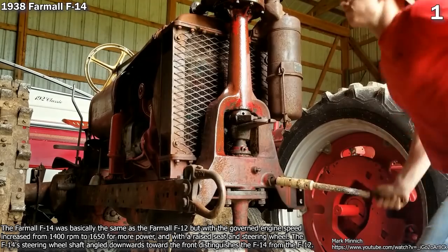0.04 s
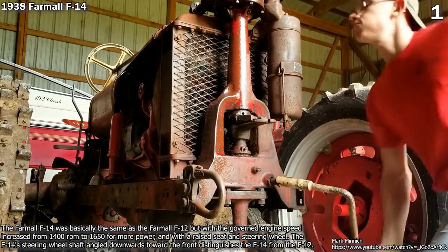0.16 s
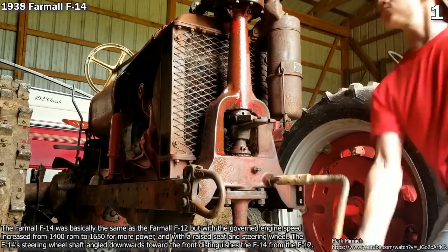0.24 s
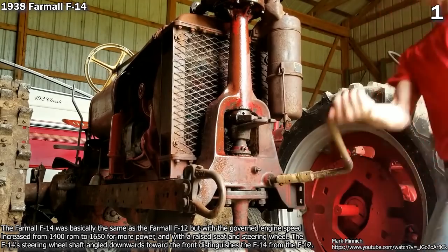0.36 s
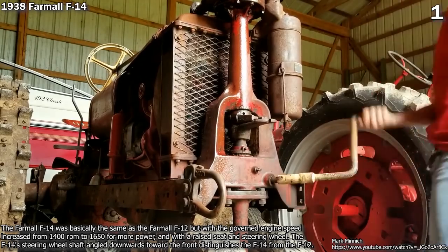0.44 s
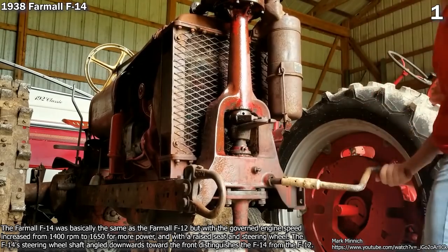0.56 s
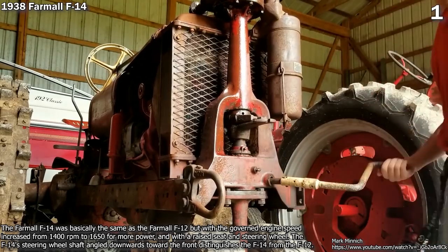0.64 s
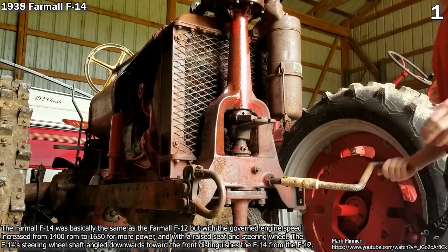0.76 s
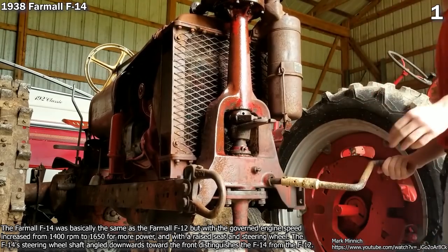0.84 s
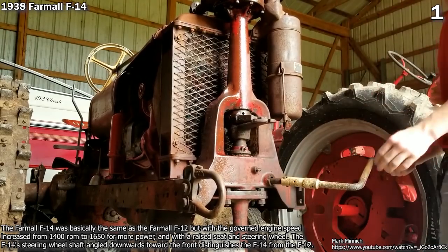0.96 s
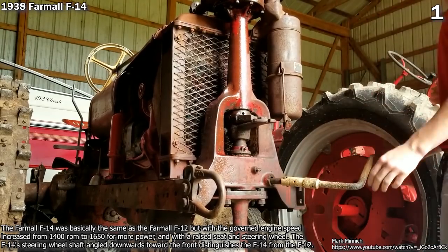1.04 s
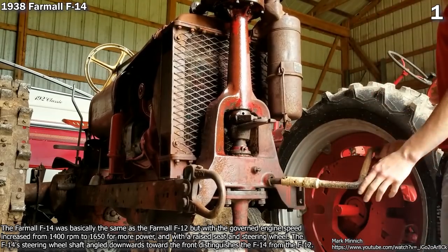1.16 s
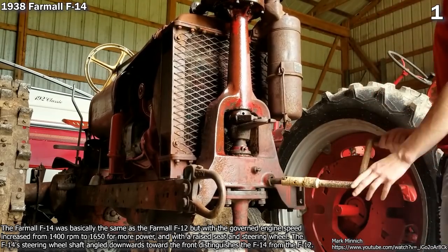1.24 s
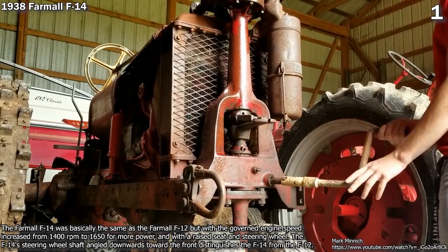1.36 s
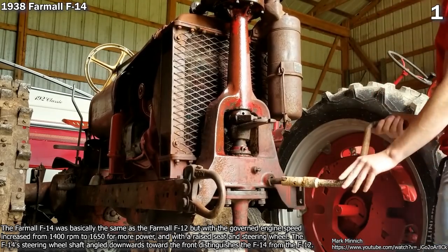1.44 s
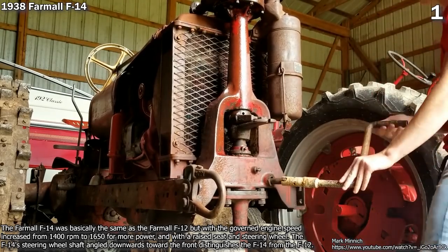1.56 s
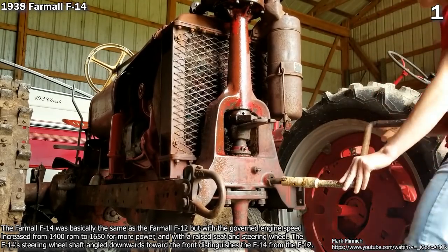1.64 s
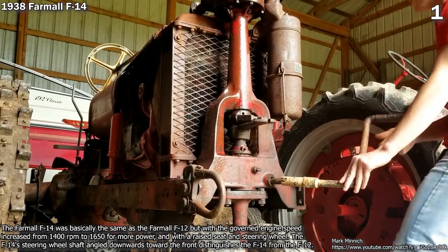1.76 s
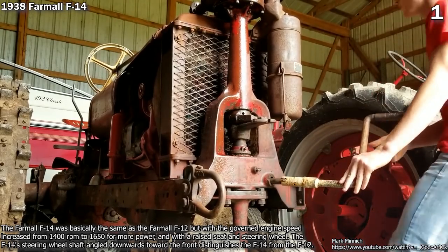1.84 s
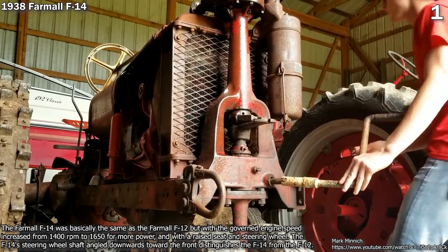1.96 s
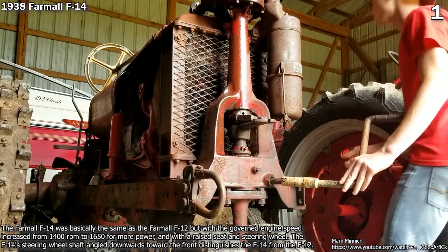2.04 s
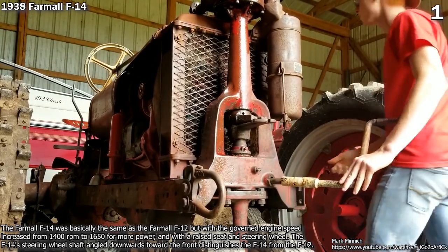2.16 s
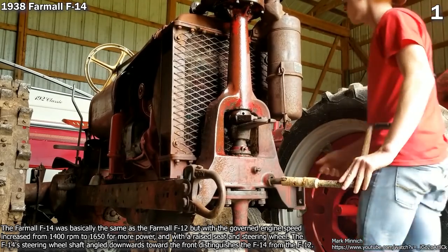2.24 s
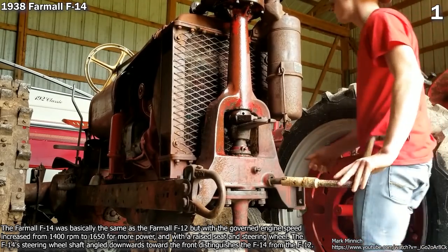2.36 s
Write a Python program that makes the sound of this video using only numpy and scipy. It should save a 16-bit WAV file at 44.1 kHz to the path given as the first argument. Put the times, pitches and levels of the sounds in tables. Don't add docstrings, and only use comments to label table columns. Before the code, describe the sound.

Old tractor engine hand-cranked in a metal barn, heavy iron clunks and bright snaps, not starting

```python
import sys
import numpy as np
from scipy import signal
from scipy.fft import rfft, irfft, next_fast_len
from scipy.io import wavfile
from scipy.ndimage import uniform_filter1d, map_coordinates

SR = 44100
rng = np.random.default_rng(int(sys.argv[2]) if len(sys.argv) > 2 else 0)


def ratio_of_db(decibels):
    return 10 ** (np.asarray(decibels, float) / 20)


def transcribe(u):
    v = np.clip(np.atleast_2d(u).T, -1, 1)
    q = np.round(v * 32767).astype(np.int16)
    wavfile.write(sys.argv[1], SR, q)


N = 105840

# frequency in Hz, level in dB.
HUM = [(59.8, -65.5), (119.6, -67.5)]
# frequency in Hz, level in dB.
AIR_TONE = [(12, -57.5), (20, -41), (70, -5), (242, -24.5), (638, -27.5), (1730, -37.5), (2770, -24.5),
            (3550, -45.5), (15000, -42.5)]
# middle in seconds, length in seconds, pitch in Hz, level in dB.
CHIRPS = [(0.028, 0.008, 2800, -57), (0.05, 0.06, 2860, -65), (1.788, 0.037, 2770, -63.5),
          (1.831, 0.034, 2690, -60.5), (1.875, .05, 2620, -69.5), (1.95, 0.084, 2430, -65),
          (2.17, .06, 2270, -64), (2.392, 0.03, 3100, -59)]
# middle in seconds, level in dB, pitch in Hz.
THUDS = [
    (0.06, -60, 98),
    (0.385, -42, 95),
    (1.301, -55.5, 130.7),
    (2.331, -60, 105),
    (2.36, -62, 245),
]
# time in seconds, level in dB.
GRIND_LEVEL = [(0.07, -69), (0.12, -42), (0.19, -39), (0.33, -27), (0.45, -34), (0.55, -30.5),
               (0.75, -35.5), (0.9, -37), (1.15, -68.5)]
# frequency in Hz, level in dB.
GRIND_TONE = [(40, -20.5), (200, -11), (400, -11.5), (800, -6.5), (1400, -14.5), (6000, -16.5),
              (8700, -14.5), (15000, -32)]
# start in seconds, peak in dB, chatter in seconds, tilt in dB per octave, echo in dB.
KNOCKS = [
    (1.227, -28, .045, 1, 1),
    (1.257, -35, 0.071, -3, 3),
    (1.712, -50, 0.046, -2, 7.5),
    (2.012, -38, .04, -5.5, 7),
    (2.044, -47, .06, -3.5, 5),
    (2.15, -54, 0.082, -6.5, 2),
    (0.174, -34, .03, 8, -8),
    (0.098, -44, .012, 3, -4),
]
# frequency in Hz, level in dB.
SHEET_TONE = [(60, -40.5), (300, -13), (420, -2.5), (1250, -0.5), (1600, -10), (3000, -16.5), (15000, -32)]
# frequency in Hz, width in Hz, level in dB.
SHEET_PEAKS = [(520, 120, -6), (850, 200, -5)]
# start in seconds, peak in dB, chatter in seconds, tilt in dB per octave, echo in dB.
CLUNKS = [
    (0.106, -36, 0.02, -1, -1),
    (0.134, -30, 0.05, -4, 3.5),
    (0.347, -4.5, 0.029, 0.55, -1),
    (0.365, -15, 0.026, 1, 9.5),
    (0.563, -6, 0.031, 0.47, 2.5),
    (0.574, -16, 0.02, -4, -14),
    (0.771, -4.5, 0.021, 0.33, -3),
]
# frequency in Hz, level in dB.
JAW_TONE = [(60, -40), (330, -16.5), (520, -8), (740, -2.5), (1600, -3.5), (6090, -5), (8620, -12.5),
            (15000, -16)]
# frequency in Hz, width in Hz, level in dB.
JAW_PEAKS = [(740, 260, -2), (1240, 120, -10), (1830, 160, -4), (3010, 250, -6), (4040, 250, -5),
             (6100, 400, -5), (12700, 150, -6)]
# start in seconds, peak in dB, chatter in seconds, tilt in dB per octave, echo in dB.
SNAPS = [(0.126, -33, 0.014, 2, -5.5), (0.136, -33, 0.0096, 1, -8.5), (0.191, -20, 0.0066, 6, -7),
         (0.204, -7, 0.022, 1.5, -1.5), (0.314, -21, 0.056, 3, 0), (0.446, -4, 0.022, 0.76, -5.5),
         (0.456, -14.5, 0.013, -2, -9), (0.629, -5.5, 0.039, 0.2, -4), (0.91, -18, 0.038, 0, 0.5),
         (0.923, -21.5, 0.034, -1.5, 1.5), (1.085, -29.5, 0.018, -2, 6), (1.607, -42, 0.025, 0.5, -4),
         (1.977, -45.5, 0.014, -7, 7)]
# frequency in Hz, level in dB.
GEAR_TONE = [(60, -35), (330, -14), (760, -5), (1900, -4), (4500, -2), (7200, -5), (8700, -3),
             (15000, -14.5)]
# frequency in Hz, width in Hz, level in dB.
GEAR_PEAKS = [(760, 370, -2), (3600, 500, -5), (4620, 250, -5), (5700, 350, -4), (7100, 300, -2),
              (9300, 300, -5), (12800, 250, -6)]
# time in seconds, level in dB.
DRONE_LEVEL = [(0.15, -78), (0.3, -53.5), (0.4, -40.5), (0.5, -52), (0.7, -38), (0.8, -44.5), (0.9, -43.5),
               (1.02, -50.5), (1.2, -76.5)]
# frequency in Hz, width in Hz, level in dB.
FRAME_PEAKS = [(206.8, 17, -3), (396.4, 31, -0.5), (511, 32, -7)]
# start in seconds, pitch in Hz, level in dB, 60 dB decay in seconds.
RINGS = [(0.205, 893, -21, 0.11), (0.205, 739, -25, 0.18), (0.348, 696.6, -20, 0.22),
         (0.348, 990, -25, 0.27), (0.348, 1846, -24, .12), (0.348, 2010, -27.5, 0.24),
         (0.348, 2425, -23.5, 0.54), (0.447, 728, -32.5, 0.18), (0.563, 740, -20.5, 0.14),
         (0.563, 1232, -20, 0.14), (0.563, 1980, -29.5, 0.083), (0.563, 2475, -23.5, 0.15),
         (0.58, 820, -26.5, 0.55), (0.63, 498, -28.5, .25), (0.771, 740, -17.5, 0.08),
         (0.771, 657, -25.5, .2), (0.771, 2425, -29, 0.22), (0.771, 3025, -30, .12),
         (0.912, 759, -32, 0.35), (0.68, 800, -30, 0.16), (0.8, 905, -27.5, 0.18)]
# start in seconds, pitch in Hz, level in dB, 60 dB decay in seconds.
SQUEAKS = [(0.225, 12700, -44, .3), (0.32, 12740, -25.5, .5), (0.345, 12750, -28.5, .3),
           (0.385, 12500, -33, .15), (0.435, 12740, -45, .2), (0.535, 11700, -34.5, .2),
           (0.548, 12760, -40.5, .3), (0.585, 12900, -40, .3), (0.63, 12800, -36.5, .2),
           (0.675, 12730, -47, .3), (0.748, 12740, -36, .3), (0.772, 13100, -39.5, .25),
           (0.8, 12850, -45.5, .4), (0.86, 12700, -48.5, .3), (1.09, 12780, -58, .3),
           (1.229, 12680, -31.5, 0.084), (1.305, 12690, -51, .25)]
# start in seconds, peak in dB, chatter in seconds, ring in Hz.
TAPS = [(1.232, -26.5, 0.022, 2220), (1.476, -43, .01, 2660), (1.57, -43.5, 0.011, 6640),
        (1.571, -47, 0.02, 687), (1.594, -46, 0.011, 2220), (1.636, -46, 0.029, 1110),
        (1.671, -45, 0.025, 433), (1.707, -44.5, 0.022, 2240), (1.728, -43, 0.016, 4080),
        (1.733, -47, 0.03, 1200), (2.013, -43, 0.018, 2250)]
# frequency in Hz, level in dB.
TAP_TONE = [(150, -19.5), (600, -3.5), (3000, -15), (8000, -23.5), (15000, -54)]
# time in seconds, level in dB.
SCUFF_LEVEL = [(1.95, -83.5), (2.06, -65.5), (2.1, -54.5), (2.17, -55.5), (2.25, -61), (2.4, -65.5)]
# frequency in Hz, level in dB.
SCUFF_TONE = [(880, -47.5), (1500, -13), (2210, -5), (2380, -7), (4160, -9.5), (15000, -16)]
# frequency in Hz, 60 dB decay in seconds.
BARN_DECAY = [(100, 4.8), (500, 1.18), (1500, 1.02), (4000, 0.83), (10000, 0.72)]
# frequency in Hz, likeness from 0 to 1.
ALIKE = [(30, 0.58), (100, .85), (400, .7), (1200, 0.09), (10000, 0.074)]
# frequency in Hz, difference in dB.
LEFT_DB = [(60, 2), (110, -1.5), (200, 4.5), (380, 0.5), (700, 7), (1290, 6), (2380, 3), (4400, 5),
           (8120, 3.5), (15000, 10.5)]
# frequency in Hz, level in
# dB.
TREBLE_TONE = [(8000, -1), (8600, -12.5), (11000, -3), (14400, 3), (14800, -23), (15900, -68)]

DULL_RISE_S, SNAP_RISE_S = 0.002, 0.0006
TIME = np.arange(N) / SR
STRIKE_HZ = np.fft.rfftfreq(4096, 1 / SR)


def unit(x):
    return x / np.sqrt(np.mean(x ** 2) + 1e-20)


def along(points, hz):
    f, v = np.transpose(points)
    return np.interp(np.log(hz + 1), np.log(f + 1), v)


def curve(rows):
    return np.interp(TIME, *np.transpose(rows))


def wobble(rate):
    knots = rng.standard_normal(int(N * rate / SR) + 4)
    return map_coordinates(knots, [np.arange(N) * rate / SR])


def filtered(x, response):
    m = next_fast_len(x.shape[-1] + 8192)
    spectrum = rfft(x, m) * response(np.fft.rfftfreq(m, 1 / SR))
    return irfft(spectrum, m)[..., :x.shape[-1]]


def causal(db):
    c = irfft(np.maximum(db, -120) * np.log(10) / 20)
    half = len(c) // 2
    c[1:half] *= 2
    c[half + 1:] = 0
    return irfft(np.exp(rfft(c)))[:half]


def pair(a, b):
    def mid_and_side(hz):
        turn = np.arccos(np.clip(along(ALIKE, hz), -1, 1)) / 2
        return np.array([np.cos(turn), np.sin(turn)])

    mid, side = filtered(np.array([a, b]), mid_and_side)
    return np.array([mid + side, mid - side])


def rush(tone, spiky_db):
    rough = ratio_of_db(spiky_db * wobble(150) + spiky_db * wobble(24.54))
    a, b = rough * rng.standard_normal((2, N))
    return unit(filtered(pair(a, b), lambda hz: ratio_of_db(along(tone, hz))))


def barn(x):
    hz, t, z = signal.stft(rng.standard_normal((2, 4 * SR // 3)), SR, nperseg=256)
    dying = ratio_of_db(-60 * t / along(BARN_DECAY, hz)[:, None])
    hall = signal.istft(z * dying, SR, nperseg=256)[1]
    seconds = np.arange(hall.shape[1]) / SR
    near = rng.standard_normal(hall.shape) * ratio_of_db(-60 * seconds / 0.12)
    both = ratio_of_db(-1) * hall / np.linalg.norm(hall[0]) + ratio_of_db(1) * near / np.linalg.norm(near[0])
    both = both * (1 - np.exp(-seconds / 0.0048))
    return signal.fftconvolve(x[None], pair(*both), axes=1)


def add(out, x, s):
    i = max(round(s * SR), 0)
    out[:, i:i + x.shape[1]] += x[:, :out.shape[1] - i]


def strike(s, db, chatter_s, rise_s, colour_db, echo_db):
    out = np.zeros((2, N))
    t = np.arange(SR // 12) / SR - 4 * rise_s
    hit = rng.random(len(t)) < 3500 / SR
    swell = np.exp(np.minimum(t, 0) / rise_s)
    fade = ratio_of_db(-30 * (np.abs(t) / max(chatter_s, 0.003)) ** 1.36)
    contacts = (hit + 0.13) * rng.standard_normal(len(t)) * np.where(t < 0, swell, fade)
    part = causal(colour_db)
    x = signal.fftconvolve(contacts, part)
    x *= ratio_of_db(db) / np.sqrt(np.max(uniform_filter1d(x ** 2, size=88))) / 2

    k = np.arange(SR // 100)
    smear = rng.standard_normal((2, len(k))) * ratio_of_db(-60 * k / SR / 0.0079)
    smear = ratio_of_db(-4.5) * smear / np.linalg.norm(smear, axis=1, keepdims=True)
    smear = smear + (k == 0)
    add(out, signal.fftconvolve(x[None], smear, axes=1), s - 4 * rise_s)
    echo = barn(part * np.linalg.norm(x) / np.linalg.norm(part))
    add(out, ratio_of_db(echo_db) * echo, s)
    return out


def blows(rows, tone, peaks, rise_s):
    out = 0
    for s, db, chatter_s, tilt_db, echo_db in rows:
        ring = 0
        for centre, width, top_db in peaks:
            height = ratio_of_db(5 + 1.5 * rng.standard_normal() + top_db / 2) ** 2
            ring = ring + height / (1 + (2 * (STRIKE_HZ - centre) / width) ** 2)
        tilt = tilt_db * np.log2(np.maximum(STRIKE_HZ, 450) / 2000)
        colour_db = along(tone, STRIKE_HZ) + 10 * np.log10(1 + ring) + tilt
        out = out + strike(s, db, chatter_s, rise_s, colour_db, echo_db)
    return out


def ringing(rows, rise_s, waver):
    x, t = np.zeros((2, N)), np.arange(SR // 2) / SR
    drift = waver * wobble(40)
    phases = rng.normal(0, 0.84, (len(rows), 2, 1))
    for (s, hz, db, t60), phase in zip(rows, phases):
        waving = np.roll(drift, round(hz))[:len(t)]
        level = ratio_of_db(db - 60 * t / t60) * (1 - np.exp(-t / rise_s))
        add(x, level * np.sin(2 * np.pi * hz * t + waving + phase), s)
    return x


def mains_hum():
    out = 0
    for hz, db in HUM:
        level = ratio_of_db(db + 2.0 * wobble(1.5))
        out = out + level * np.sin(2 * np.pi * hz * TIME + 0.36 * wobble(20))
    return out


def barn_air():
    return ratio_of_db(-62) * rush(AIR_TONE, 0.92)


def bird():
    waver = 2.4 * wobble(130)
    x = 0
    for s, length, hz, db in CHIRPS:
        level = ratio_of_db(db) * ratio_of_db(3.5 * wobble(70)) * np.exp(-2 * ((TIME - s) / length) ** 2)
        x = x + level * np.sin(2 * np.pi * hz * TIME + waver)
    return x + ratio_of_db(-8.5) * barn(x)[:, :N]


def thuds():
    out = 0
    for s, db, hz in THUDS:
        swell = ratio_of_db(db) * np.exp(-((TIME - s) / 0.045) ** 2)
        out = out + swell * np.sin(2 * np.pi * hz * TIME + 1.3 * wobble(30))
    return out


def grind():
    return ratio_of_db(curve(GRIND_LEVEL + [(1.4, -110)])) * rush(GRIND_TONE, 2)


def sheet_knocks():
    return blows(KNOCKS, SHEET_TONE, SHEET_PEAKS, DULL_RISE_S)


def jaw_clunks():
    return blows(CLUNKS, JAW_TONE, JAW_PEAKS, DULL_RISE_S)


def gear_snaps():
    return blows(SNAPS, GEAR_TONE, GEAR_PEAKS, SNAP_RISE_S)


def frame_drone():
    def body(hz):
        return sum(ratio_of_db(db) / (1 + (2 * (hz - centre) / width) ** 2) for centre, width, db in FRAME_PEAKS)

    level = ratio_of_db(curve(DRONE_LEVEL + [(1.4, -110)]))
    rumble = pair(*rng.standard_normal((2, N)))
    return level * unit(filtered(rumble, body))


def squeaks_and_rings():
    squeaks = ringing(SQUEAKS, rise_s=0.004, waver=0.7)
    rings = ringing(RINGS, rise_s=0.002, waver=0.8)
    both = squeaks + rings
    return both + ratio_of_db(-10) * barn(both.mean(0))[:, :N]


def crank_taps():
    out = 0
    for s, db, chatter_s, ring_hz in TAPS:
        peak = ratio_of_db(17) ** 2 / (1 + (2 * 7 * (STRIKE_HZ / ring_hz - 1)) ** 2)
        colour_db = along(TAP_TONE, STRIKE_HZ) + 10 * np.log10(1 + peak)
        out = out + strike(s, db, chatter_s, SNAP_RISE_S, colour_db, echo_db=-3)
    return out


def shoe_scuff():
    return ratio_of_db(curve(SCUFF_LEVEL)) * rush(SCUFF_TONE, 1.6)


def scene():
    turning = grind()
    iron = jaw_clunks() + gear_snaps() + crank_taps() + squeaks_and_rings() + sheet_knocks()
    low = frame_drone() + thuds()
    around = bird() + mains_hum() + barn_air() + shoe_scuff()
    return turning + iron + low + around


def top_cut(x):
    return signal.sosfilt(signal.butter(12, 15900, fs=SR, output="sos"), x)


def record(dry):
    sign = np.array([[0.5], [-0.5]])

    def placing(hz):
        late = np.exp(-2j * np.pi * hz * sign * 0.0001)
        return ratio_of_db(sign * along(LEFT_DB, hz)) * late

    x = filtered(dry, placing)
    x = x / (1 + np.abs(x) ** 5) ** (1 / 5)
    mix = filtered(x, lambda hz: ratio_of_db(along(TREBLE_TONE, hz)))
    return top_cut(mix)


dry = scene()
out = record(dry)
transcribe(out)
```